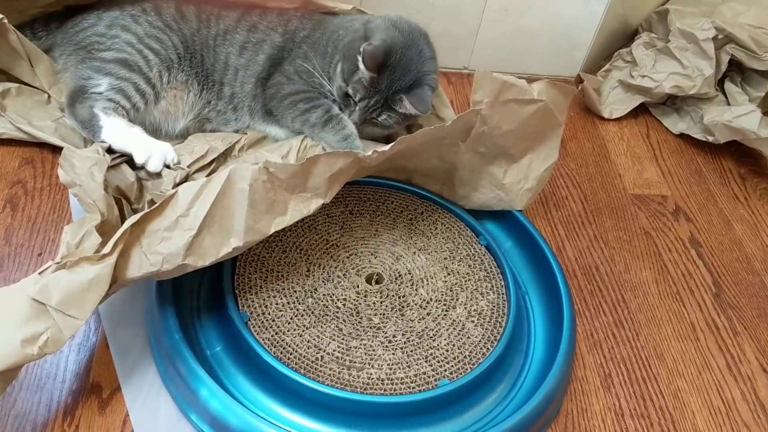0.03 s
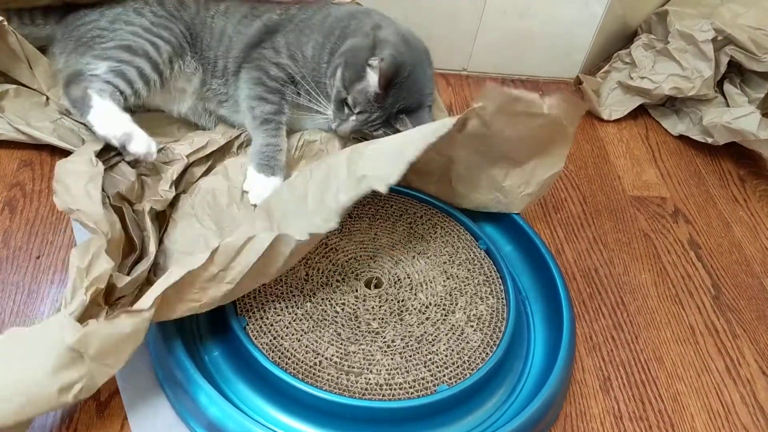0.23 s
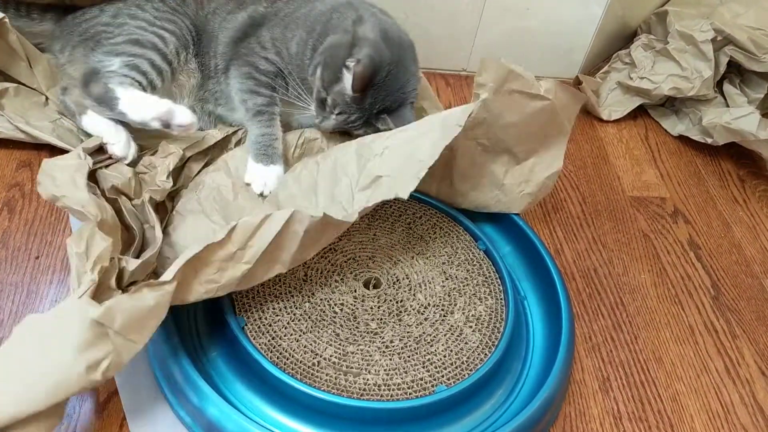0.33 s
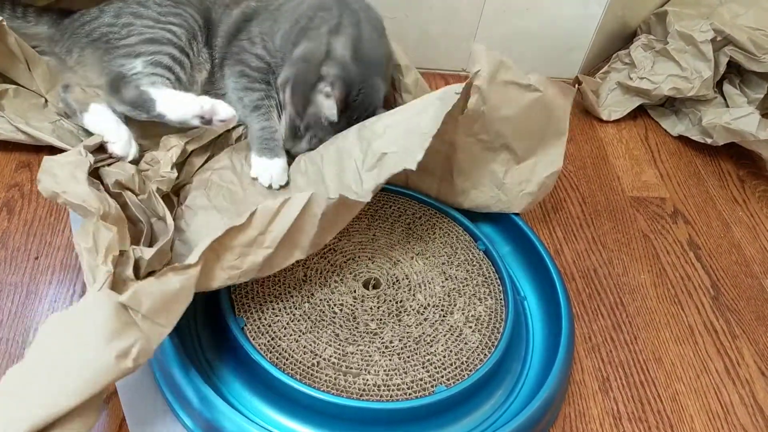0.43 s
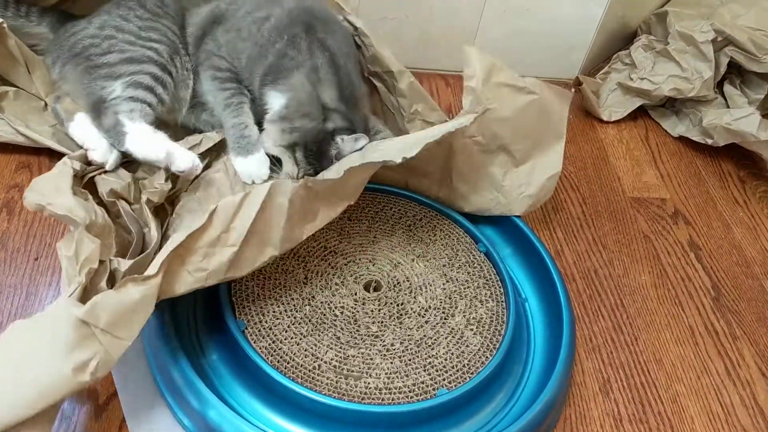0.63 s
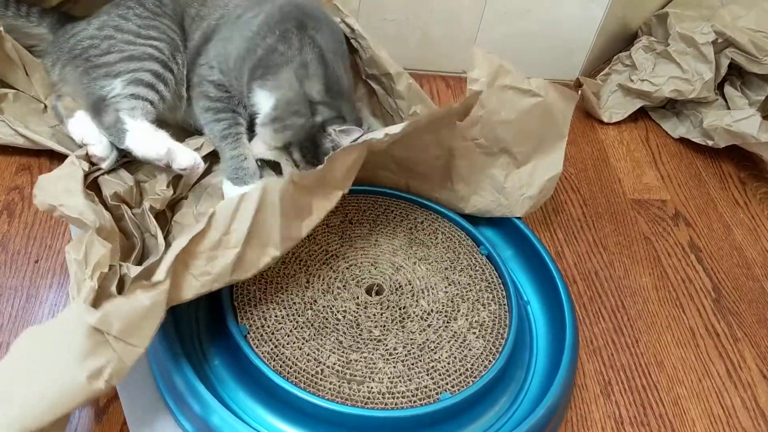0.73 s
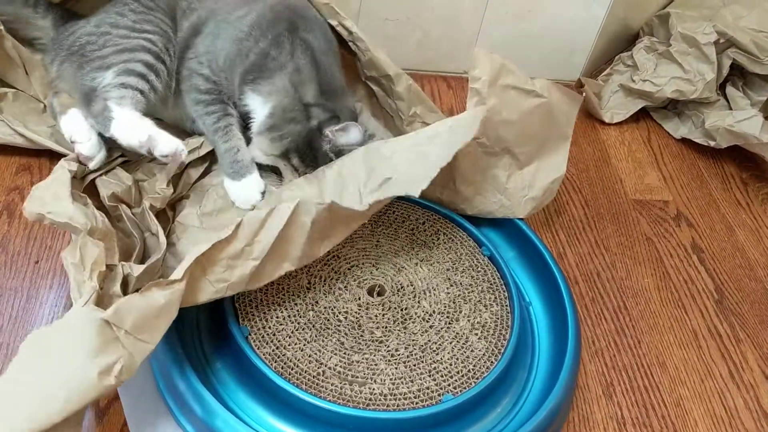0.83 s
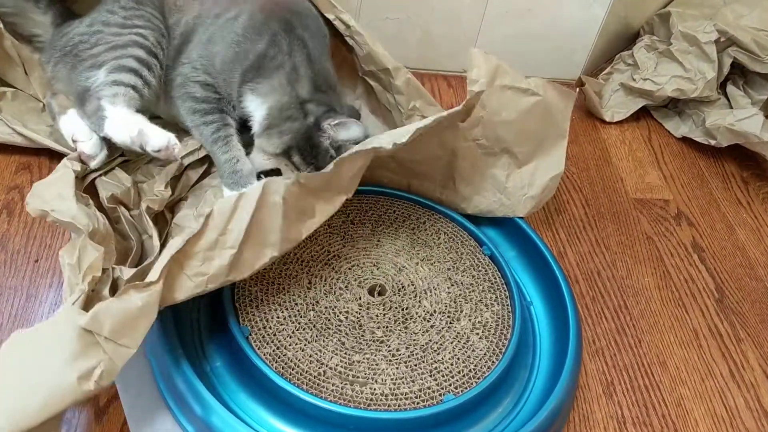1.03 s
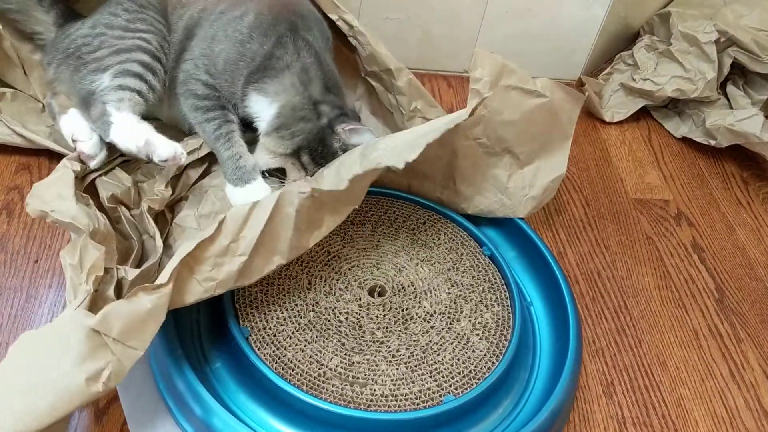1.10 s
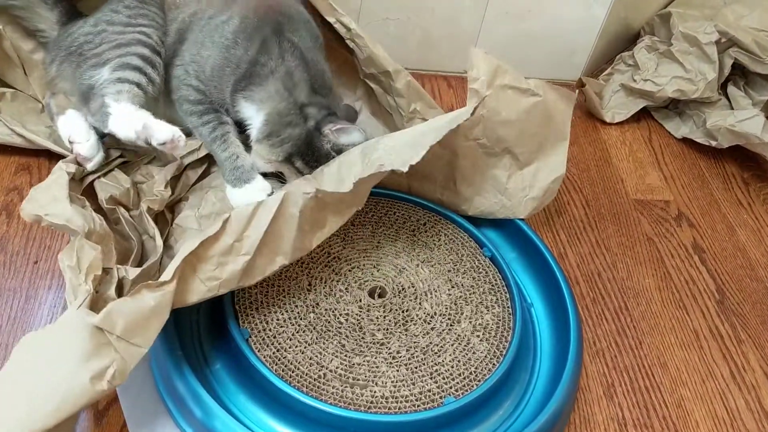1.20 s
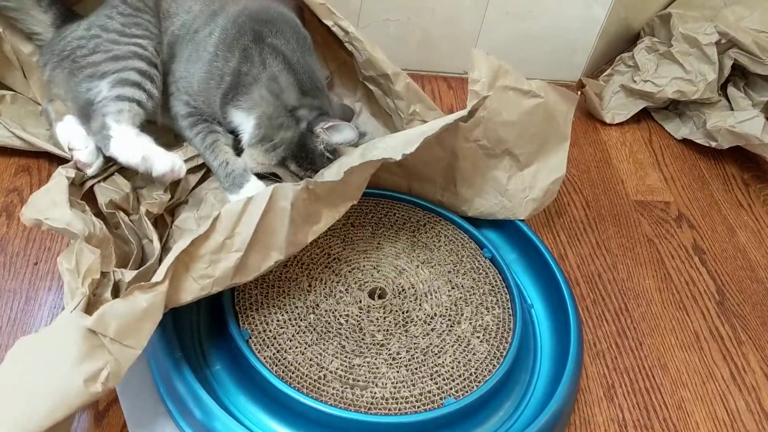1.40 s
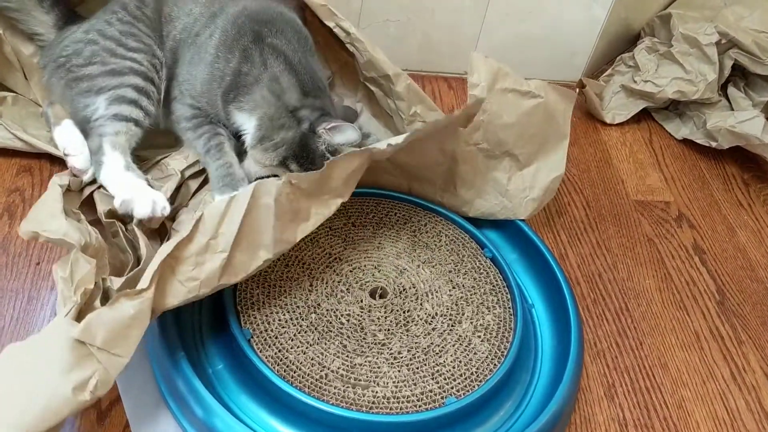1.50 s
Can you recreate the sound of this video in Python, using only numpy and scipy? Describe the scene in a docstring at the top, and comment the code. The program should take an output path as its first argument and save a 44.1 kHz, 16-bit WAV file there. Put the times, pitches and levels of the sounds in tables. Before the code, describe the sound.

Crumpled packing paper crinkles close by as a cat paws at it. After a nearly quiet start, the loudest burst of sharp crackles comes from about 0.2 to 0.45 seconds. The sheet keeps rustling with small snaps, swelling again around 0.85 and 1.1 seconds. It then thins to a few faint ticks by 1.5 seconds, over the soft background noise of a small room.

```python
"""A small room with a wooden floor, one microphone close to a cat pawing crumpled packing paper.
The sheet rustles as it slides; each shove buckles it in an avalanche of tiny cracks.
Single creases snap through, flat panels buzz and the broad folds flap dully under the paws.
Soft room noise and a faint hum lie under it all."""
import sys
import numpy as np
from scipy import signal
from scipy.fft import rfft, irfft, next_fast_len
from scipy.io import wavfile
from scipy.ndimage import map_coordinates

SR = 44100
rng = np.random.default_rng(int(sys.argv[2]) if len(sys.argv) > 2 else 0)


def persist_wave(psi):
    """Save psi, clipped to +-1, as 16-bit WAV."""
    counts = np.round(np.clip(psi, -1, 1) * 32767).astype(np.int16)
    wavfile.write(sys.argv[1], SR, np.atleast_2d(counts).T)


N = 68355

# the sliding sheet: t/s, body level/dB, crisp level/dB
SLIDE_LEVELS = [(0, -68, -92), (.17, -64.5, -63.5), (.186, -51, -52.5), (0.227, -29, -37), (.34, -35, -40),
                (.45, -36.5, -43), (0.549, -37, -44), (.64, -41, -45.5), (.78, -42.5, -47.5),
                (.84, -38, -45), (.90, -36, -45.5), (.95, -40.5, -45.5), (1.07, -42.5, -48.5),
                (1.16, -39.5, -46), (1.25, -47.5, -50.5), (1.319, -48, -53), (1.39, -53, -56),
                (1.55, -53, -56)]
# avalanches of cracks: peak t/s, body level/dB, crisp level/dB, rise/s, fall/s
AVALANCHES = [(0.192, -31, -41.5, 0.0036, 0.0021), (0.207, -32, -35.5, 0.006, 0.0019),
              (0.2197, -33, -39, 0.00085, 0.0015), (0.23, -32.5, -28.5, 0.001, .004),
              (0.2381, -21, -26.5, 0.0031, 0.0037), (0.2479, -16, -21, .002, 0.0062),
              (0.298, -26, -42, 0.0022, 0.0066), (.315, -33.5, -28, 0.0076, 0.0044),
              (0.324, -22, -30, 0.0076, 0.0072), (0.382, -50, -36, 0.00085, 0.0063),
              (.403, -26.5, -42.5, 0.011, 0.021), (0.4237, -20.5, -22, 0.0027, 0.0013),
              (.432, -30, -33, 0.002, 0.0069), (0.46, -33, -33, 0.00077, 0.0029),
              (0.493, -31.5, -35, .001, 0.0017), (0.52, -30.5, -35, 0.0039, 0.0022),
              (.557, -50, -41.5, 0.0025, 0.0066), (0.611, -30, -33.5, 0.0017, 0.0039),
              (.632, -27, -29, 0.0053, 0.0038), (0.67, -28.5, -29, 0.0012, 0.0023),
              (.695, -31.5, -31, 0.00075, 0.0032), (0.7334, -40, -26.5, 0.0005, 0.0011),
              (0.737, -27.5, -33, 0.0017, 0.0036), (.806, -28, -39, 0.0017, 0.0033),
              (0.8204, -23.5, -30, 0.0063, 0.005), (0.831, -25, -33.5, 0.0059, 0.0027),
              (0.85, -29.5, -33, 0.0012, 0.0072), (0.907, -31.5, -29, .001, 0.0021),
              (0.922, -26, -35, 0.0013, 0.0045), (1.038, -29, -38.5, 0.00089, 0.0072),
              (1.054, -47, -35, .001, 0.0027), (1.08, -34.5, -42, 0.00091, 0.0039),
              (1.096, -30, -37, 0.0018, 0.00081), (1.124, -22, -28.5, 0.0028, 0.0051),
              (1.189, -46, -31.5, 0.00066, .002), (1.237, -36.5, -39, 0.0044, .003),
              (1.273, -34.5, -37, 0.0038, 0.0013), (1.3377, -35, -45.5, 0.0015, 0.0022),
              (1.411, -40, -45.5, .0006, 0.0017), (1.456, -47, -49, 0.0026, 0.0065),
              (1.489, -53, -53, 0.00072, 0.018), (1.54, -42, -46, 0.0036, 0.015)]
# creases snapping through: t/s, level/dB, f/Hz
CREASE_SNAPS = [(.0635, -41.5, 1360), (.164, -39, 1590), (.174, -35, 1450), (0.2457, -14.5, 1700),
                (0.25, -39, 1400), (.307, -9.5, 2160), (0.5195, -33, 2300), (0.5744, -24, 2020),
                (0.5847, -27, 2760), (0.6702, -19, 6160), (0.7212, -21.5, 2170), (.870, -10.5, 1840),
                (0.9755, -22, 2010), (1.1072, -29, 2150), (1.1247, -13.5, 1940), (1.1901, -28.5, 2330),
                (1.315, -33, 2240)]
# flat panels buzzing between creases: t/s, level/dB, f/Hz, fall/s
PANEL_BUZZES = [(0.065, -45.5, 560, 0.0065), (0.204, -32.5, 612, .004), (0.272, -30.5, 462, 0.01),
                (0.3215, -26.5, 9600, 0.0025), (0.6716, -35.5, 6400, .003), (0.82, -19, 1750, 0.0067),
                (.908, -32, 9440, .003), (1.041, -32.5, 620, 0.002), (1.055, -32.5, 5600, 0.0023),
                (1.094, -36, 604, 0.0057), (1.126, -22.5, 3050, 0.0031), (1.191, -32, 6900, 0.0017),
                (1.236, -33.5, 3470, 0.0031), (1.239, -39, 574, 0.0036), (1.271, -32.5, 1440, 0.0027),
                (1.411, -45, 6740, 0.0017), (1.457, -47, 2630, 0.014), (1.488, -43, 2700, 0.014)]
# paw shoves on the broad folds: peak t/s, level/dB, rise/s, fall/s
PAW_FLAPS = [(.206, -47, 0.0052, .006), (.255, -29.5, 0.0038, 0.012), (0.323, -38, 0.045, 0.016),
             (0.43, -39.5, 0.021, 0.018), (.64, -40, 0.016, 0.02), (.825, -36, 0.019, 0.015),
             (1.121, -40, 0.013, 0.022)]
# spectra of wide panels, tight creases, friction, broad folds and room noise: f/Hz, level/dB
BODY_SPECTRUM = [(25, -72), (150, -29), (450, -14), (860, -11.5), (1050, 0), (1400, -2), (1900, 0.5),
                 (2500, -4), (3300, -10.5), (4400, -17.5), (6000, -28.5), (12000, -45)]
CRISP_SPECTRUM = [(2000, -41), (3000, -4), (3700, -3.5), (4400, -4), (5000, -16.5), (5500, 3), (7300, 2),
                  (8700, -3.5), (9800, -2.5), (12000, -8.5), (15800, -20)]
HISS_SPECTRUM = [(2000, -24), (3700, -1), (4900, -2), (5600, 0.5), (7500, 0), (8800, -6), (10800, -7.5),
                 (12300, -14), (15800, -16.5)]
FOLD_SPECTRUM = [(25, -47), (60, -17.5), (125, -4), (170, -4.5), (240, 0.5), (340, -0.5), (500, -1.5),
                 (750, 1), (1100, -23), (3000, -57)]
AIR_SPECTRUM = [(20, -31), (60, -13.5), (120, -11.5), (170, -7), (230, -4.5), (300, -13), (600, -14.5),
                (1200, -20.5), (3000, -34), (8000, -36.5), (16000, -37.5)]
# tones of the hum: f/Hz, level/dB, waver rate/Hz
HUM_TONES = [(116.3, -66.5, 10.3), (237.7, -61, 20)]
# the room's reverberation: f/Hz, time to fall 60 dB/s
ROOM_T60 = [(150, 0.86), (1500, 0.21), (6000, 0.51), (15000, 0.078)]

CRACKS_PER_S, CRACK_SPREAD_DB, CRACK_DECAY_CYCLES = 9000, 3, 1.02
SNAP_RISE_CYCLES, EDGE_DB, EDGE_DECAY_S = 0.91, -20, 0.00037
PANEL_Q, PANEL_RISE_S = 3.8, 0.00069
TAIL_DB, WALLS_DB = -15.5, -15.5  # against the direct sound
AIR_DB, TOP_HZ = -57, 15850


def crumples():
    """Each buckling sets off a run of cracks, dull in wide panels and crisp in tight creases."""
    cracks = crackle()
    body, crisp = coloured(cracks, BODY_SPECTRUM), coloured(cracks, CRISP_SPECTRUM)
    return sum(swell(body, s, body_db, rise, fall) + swell(crisp, s, crisp_db, rise, fall)
               for s, body_db, crisp_db, rise, fall in AVALANCHES)


def crackle():
    """Paper gives way in a dense stream of tiny cracks, each a cycle or two at its own pitch and size."""
    when, pitch, size, sign = rng.random((int(CRACKS_PER_S * N / SR), 4)).T
    hz = 500 * 30 ** pitch  # 500 Hz to 15 kHz
    cycles = hz[:, None] * np.arange(256) / SR
    size_db = CRACK_SPREAD_DB * np.minimum(-np.log(size), 4)  # many small, few large
    gain = hz * amp(size_db) * np.sign(sign - .5)
    cracks = gain[:, None] * np.exp(-cycles / CRACK_DECAY_CYCLES) * np.cos(2 * np.pi * cycles)
    at = (when * N).astype(int)[:, None] + np.arange(cracks.shape[1])
    return np.bincount(at.ravel(), cracks.ravel(), N)[:N]


def snaps():
    """A crease flips over: a sharp-edged crack and two or three swings of its panel."""
    out, t = np.zeros(N + SR), np.arange(SR // 100) / SR
    for s, db, hz in CREASE_SNAPS:
        age = hz * t / SNAP_RISE_CYCLES  # 1 at the envelope's peak
        swing = (age * np.exp(1 - age)) ** 2 * np.sin(2 * np.pi * hz * t)
        edge = amp(EDGE_DB) * np.exp(-t / EDGE_DECAY_S) * rng.standard_normal(len(t))
        out[round(s * SR):][:len(t)] += amp(db) * (swing + edge)
    return out[:N]


def slide():
    """The sheet drags over itself and the floor: fine crackle and friction hiss over a low rub."""
    s, *levels = np.transpose(SLIDE_LEVELS)
    body, crisp = [amp(np.interp(np.arange(N) / SR, s, db)) for db in levels]
    cracks = unit(crackle())
    hiss = amp(7) * rng.standard_normal(N)  # paper on paper, 7 dB over the crackle
    rub = amp(-10.5) * coloured(rng.standard_normal(N), FOLD_SPECTRUM)
    return body * (coloured(cracks, BODY_SPECTRUM) + rub) + crisp * coloured(cracks + hiss, HISS_SPECTRUM)


def panels():
    """A jolted panel rattles in a broad resonance, higher the smaller it is."""
    out = np.zeros(N)
    for s, db, hz, fall in PANEL_BUZZES:
        band = signal.butter(2, hz * np.exp(np.array([-.5, .5]) / PANEL_Q), "bandpass", fs=SR)
        buzz = signal.lfilter(*band, rng.standard_normal(N))
        out += swell(buzz, s, db, PANEL_RISE_S, fall)
    return out


def flaps():
    """The paws shove broad folds, which push the air with a dull puff."""
    puff = coloured(rng.standard_normal(N), FOLD_SPECTRUM)
    return sum(swell(puff, *row) for row in PAW_FLAPS)


def room(x):
    """Floor and near walls reflect into the microphone within 15 ms, over a short diffuse tail."""
    hz, t, noise = signal.stft(rng.standard_normal(SR // 2), SR, nperseg=256)
    decay = amp(-60 * t / along(ROOM_T60, hz)[:, None])
    tail = signal.istft(noise * decay, SR, nperseg=256)[1]
    delay, strength = rng.random((2, 10))
    walls = np.bincount((SR * (.001 + .014 * delay)).astype(int), strength - .5, len(tail))
    response = amp(TAIL_DB) * tail / np.linalg.norm(tail) + amp(WALLS_DB) * walls / np.linalg.norm(walls)
    return signal.fftconvolve(x, response)[:N]


def room_tone():
    """Soft noise with a low wavering hum, far below the paper."""
    t = np.arange(N) / SR
    out = amp(AIR_DB) * coloured(rng.standard_normal(N), AIR_SPECTRUM)
    for hz, db, waver in HUM_TONES:
        drift = map_coordinates(rng.standard_normal(256), [t * waver], mode="wrap")
        out += amp(db) * unit(np.sin(2 * np.pi * hz * t + 1.57 * drift))
    return out


def amp(db):
    """Decibels to gain."""
    return 10 ** (np.asarray(db) / 20)


def unit(x):
    """Scaled to rms 1."""
    return x / np.sqrt(np.mean(x ** 2) + 1e-20)


def along(points, hz):
    """Read (f/Hz, value) points at hz, on a log frequency axis."""
    f, values = np.transpose(points)
    return np.interp(np.log(hz + 1), np.log(f + 1), values)


def coloured(x, spectrum):
    """x through a causal filter of this spectrum, at rms 1."""
    m = 2 * next_fast_len(N)
    gain = amp(along(spectrum, np.fft.rfftfreq(m, 1 / SR)))
    cepstrum = irfft(np.log(gain))
    cepstrum[1:m // 2] *= 2  # minimum phase keeps the attacks sharp
    cepstrum[m // 2 + 1:] = 0
    response = np.exp(rfft(cepstrum))
    return unit(irfft(rfft(x, m) * response, m)[:N])


def swell(stream, s, db, rise, fall):
    """A stretch of the stream that builds to a level at time s and dies away."""
    t = np.arange(N) / SR - s
    shape = np.exp(-np.maximum(-t / rise, t / fall))
    burst = stream * shape
    return amp(db) * burst * np.linalg.norm(shape) / (np.linalg.norm(burst) + 1e-12)


def scene():
    """The paper close up, the room faint behind it, in mono."""
    paper = slide() + crumples() + snaps() + panels() + flaps()
    return (paper + room(paper) + room_tone())[None]


def record(dry):
    """The microphone channel passes nothing above TOP_HZ."""
    m = next_fast_len(N + SR // 2)
    passband = np.fft.rfftfreq(m, 1 / SR) < TOP_HZ
    return irfft(rfft(dry, m) * passband, m)[:, :N]


dry = scene()
out = record(dry)
persist_wave(out)
```